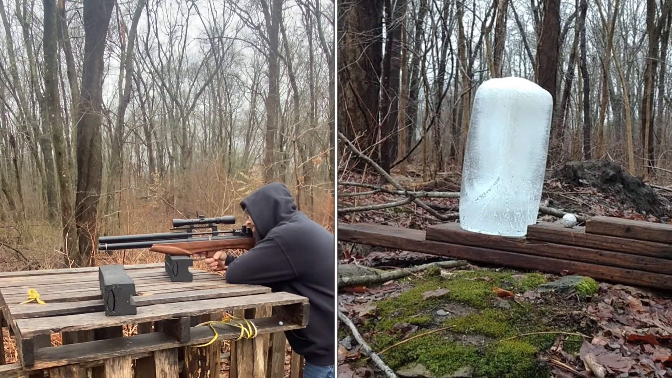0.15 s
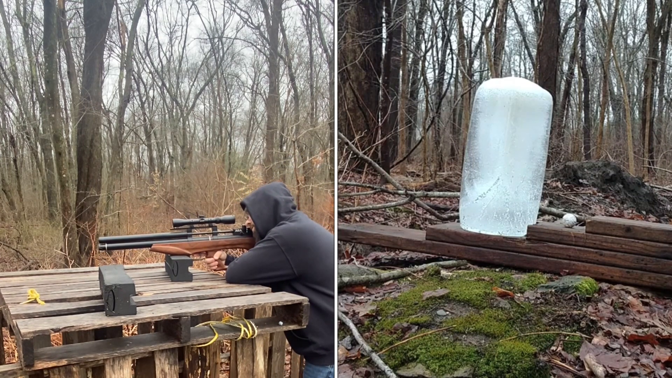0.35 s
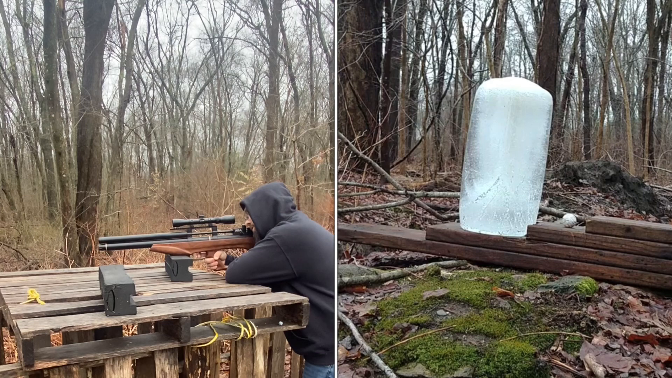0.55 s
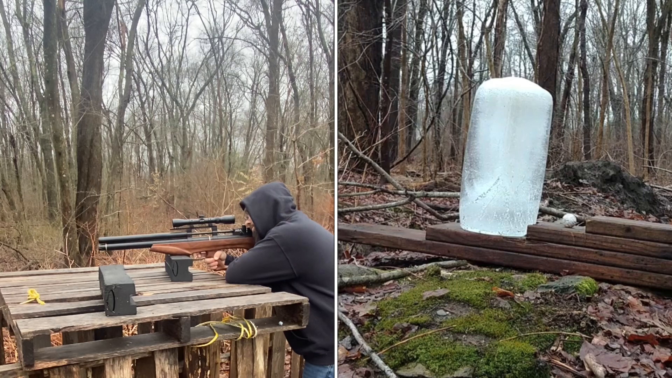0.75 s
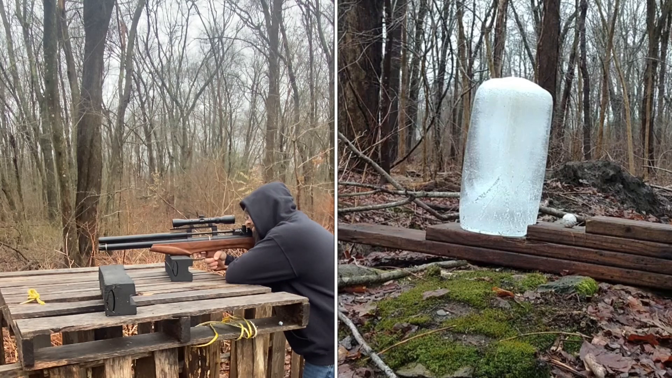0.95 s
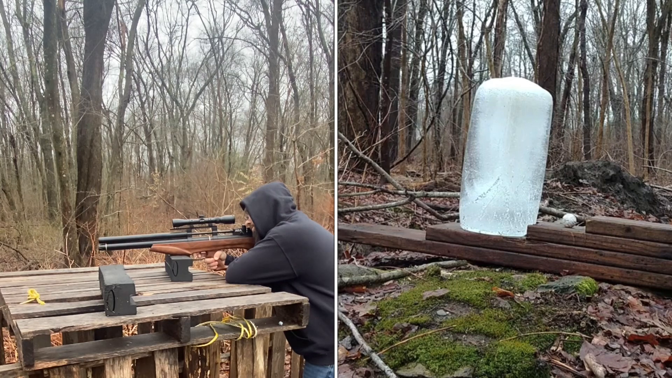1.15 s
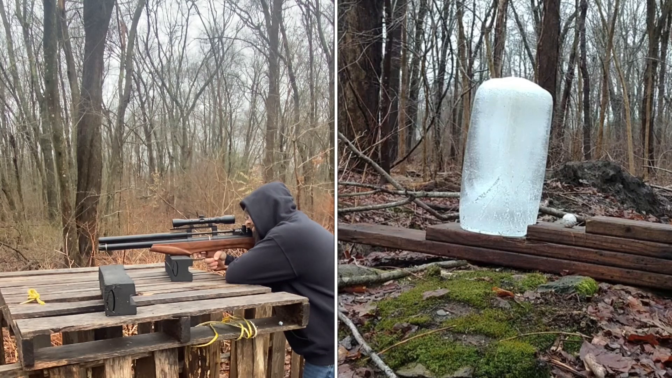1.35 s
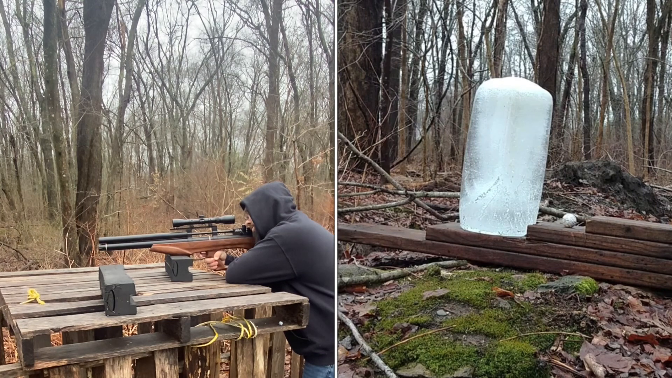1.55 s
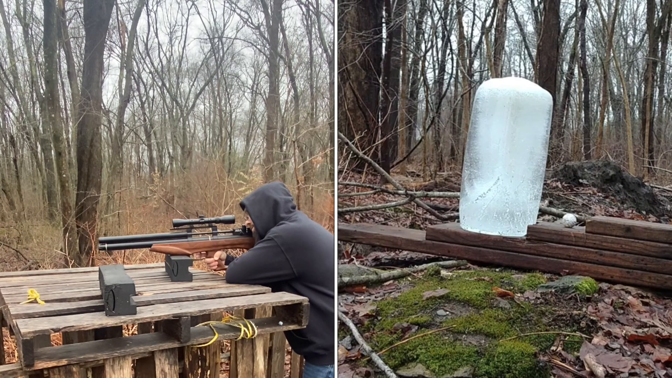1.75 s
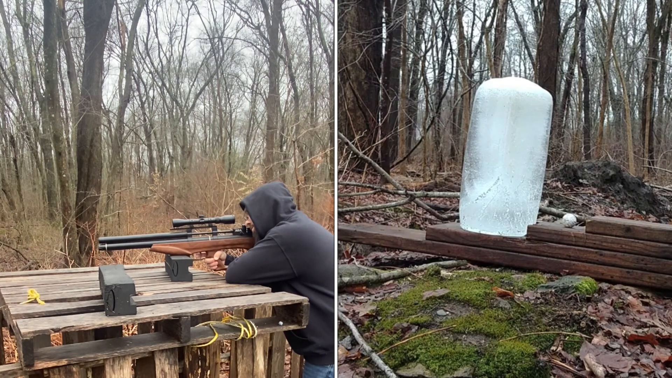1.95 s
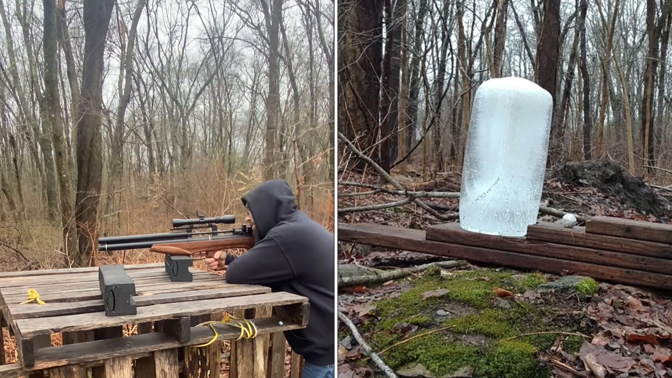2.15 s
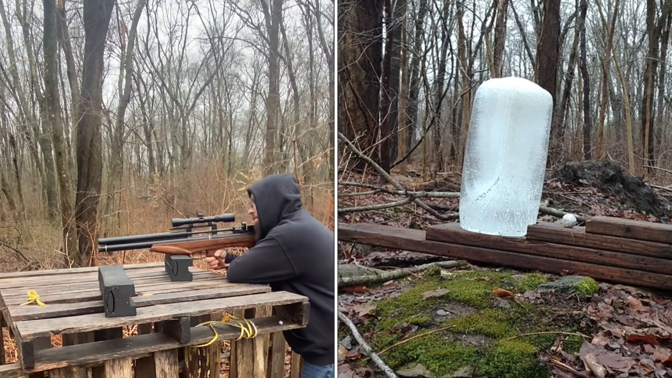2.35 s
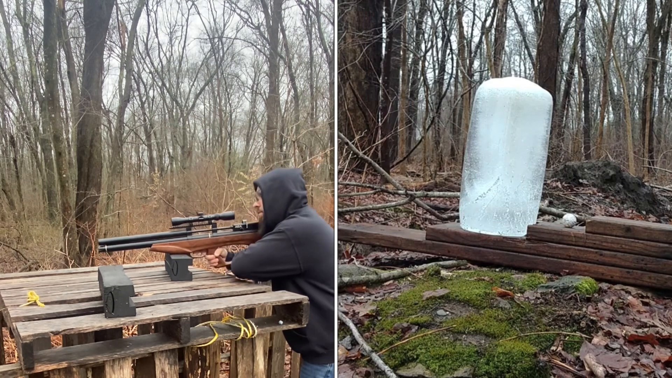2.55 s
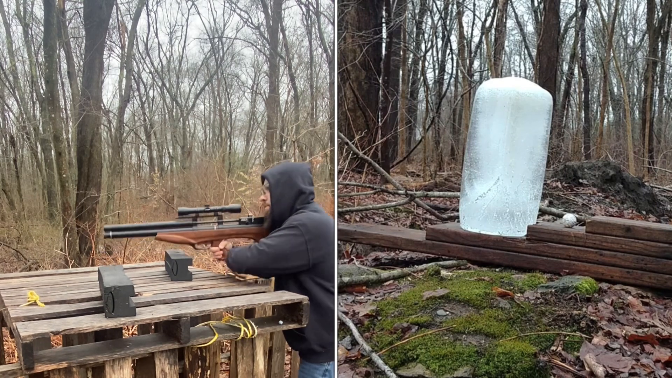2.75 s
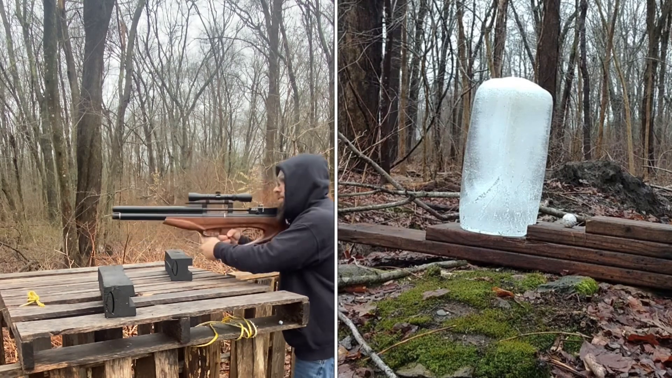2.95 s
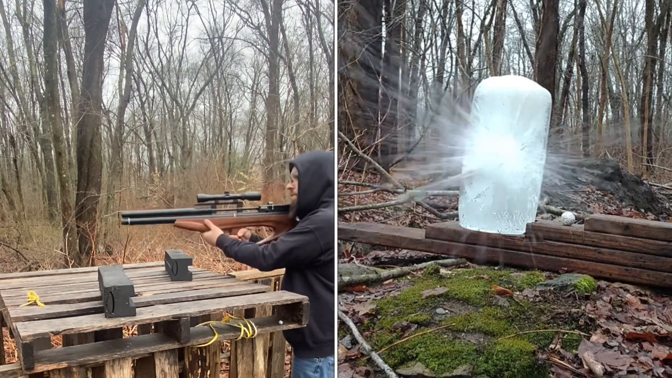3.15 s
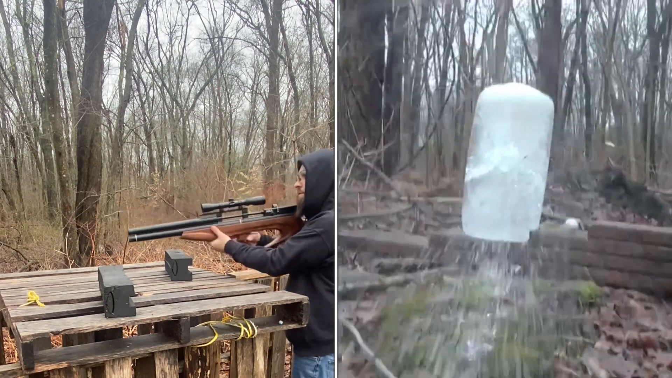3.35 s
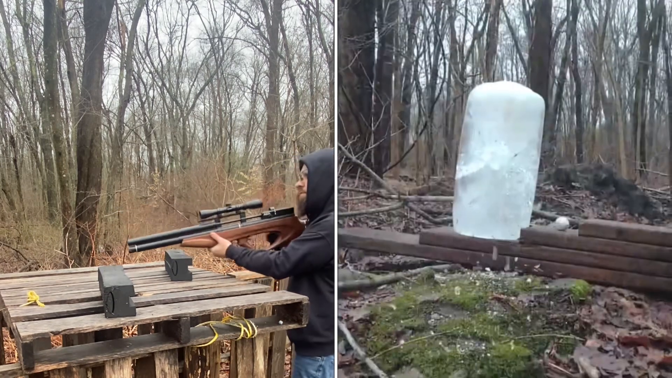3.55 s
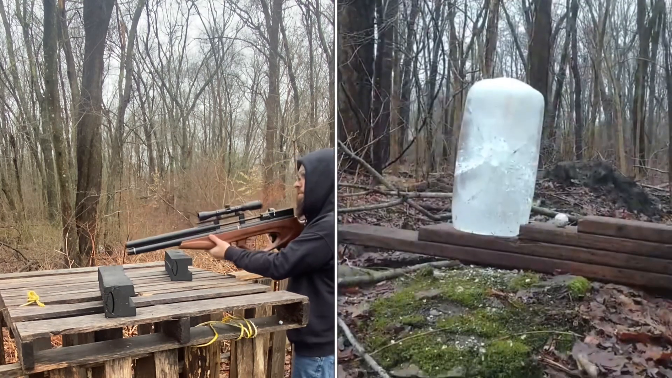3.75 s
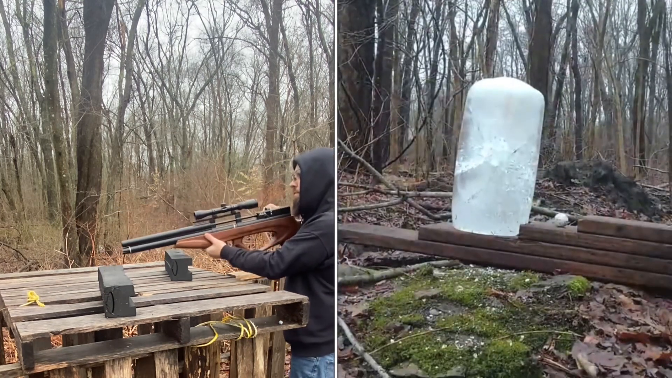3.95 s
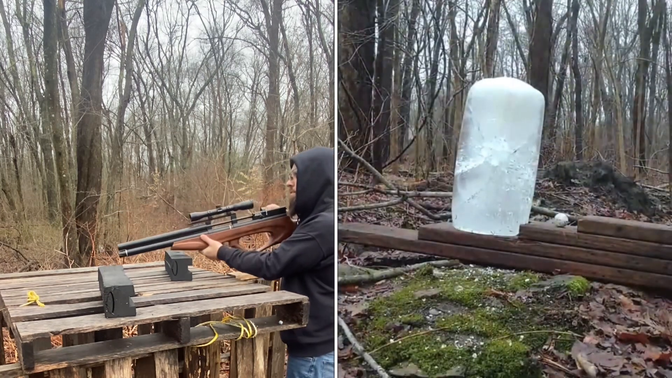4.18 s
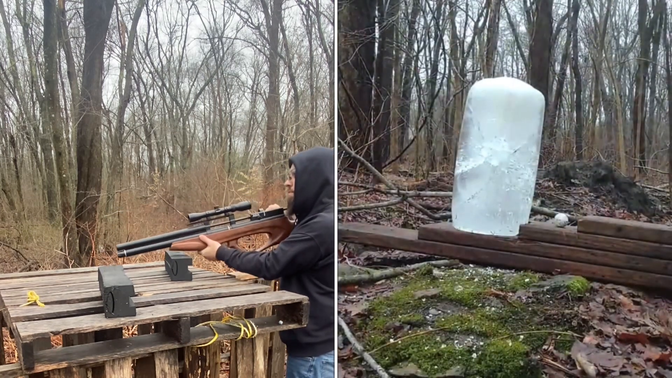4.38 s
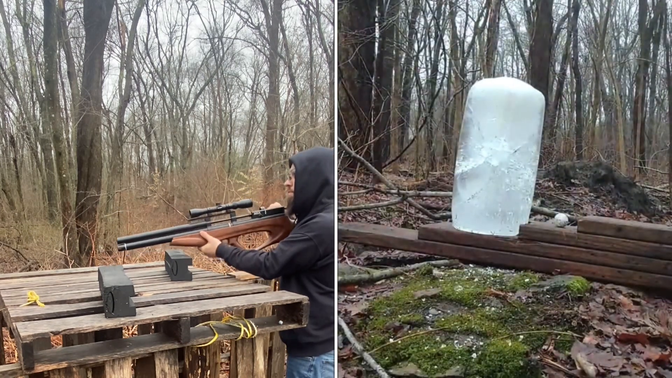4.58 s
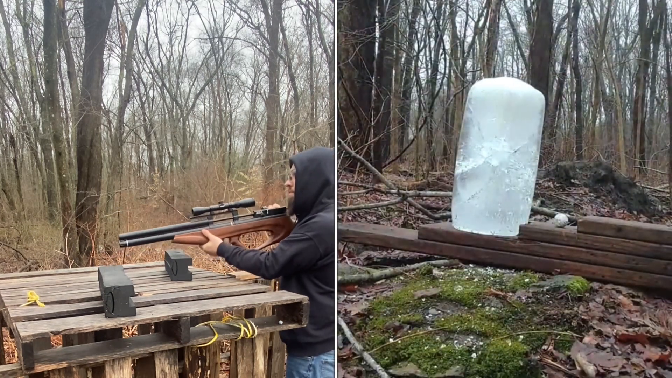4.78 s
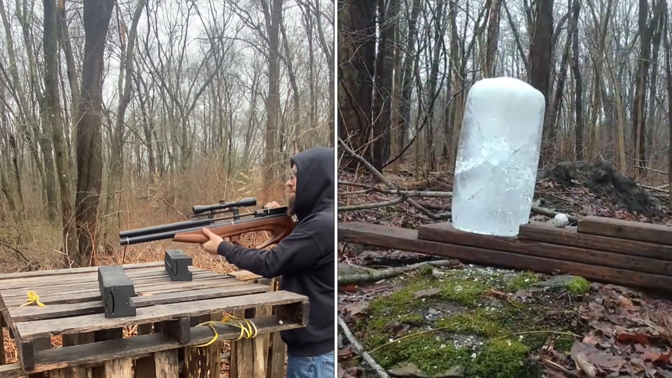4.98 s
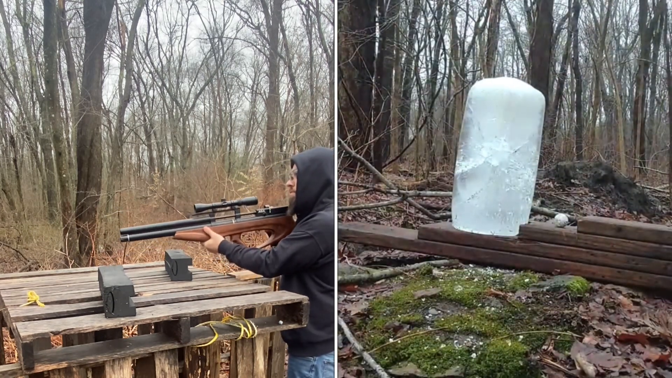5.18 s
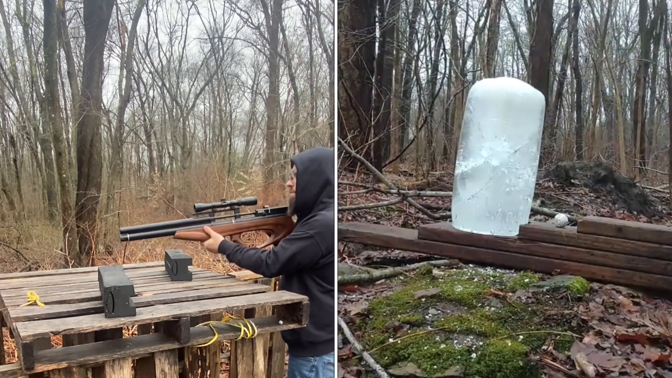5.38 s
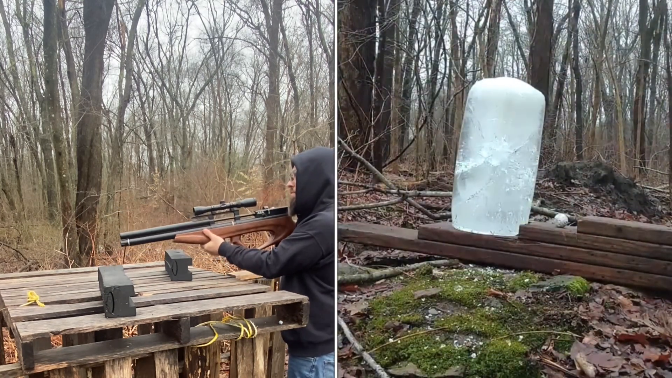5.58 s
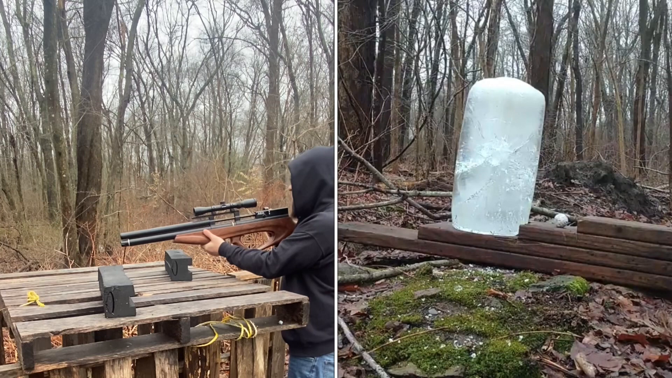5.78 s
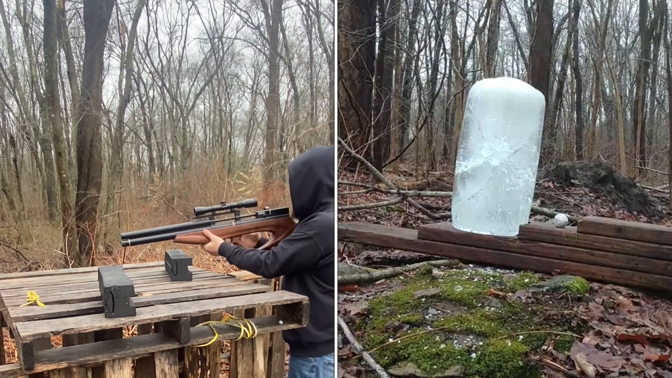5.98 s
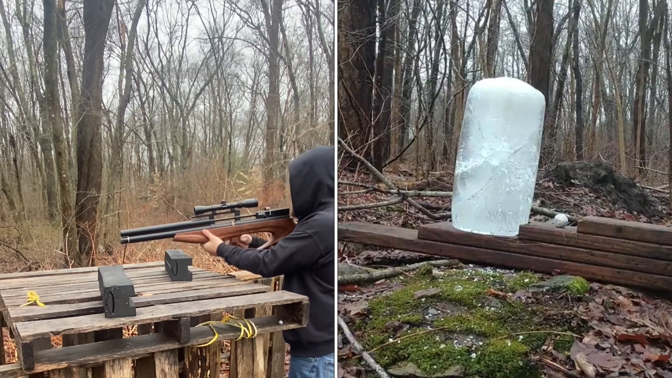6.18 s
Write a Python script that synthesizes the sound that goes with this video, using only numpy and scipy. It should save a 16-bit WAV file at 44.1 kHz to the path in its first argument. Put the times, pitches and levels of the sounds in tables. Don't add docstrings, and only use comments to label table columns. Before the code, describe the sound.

A quiet damp wood with far traffic: soft mid-range wash and deep rumble, gently swelling. A barely audible tick comes at 0.2 s. At 1.43 s an air rifle fires close by: a very loud, hard metallic snap with a short burst of air, ringing barrel and low table thud, another clack at 1.5 s, then a brief echo from the trunks fading into the wood. A faint dull thump falls at 2.4 s. At 3.18 s ice cracks explosively near the second microphone, chips batter its housing in irregular thumps and grainy spray hisses until about 3.45 s; the road wash drops, then slowly recovers over faint settling dust. Light clicks start at 3.87 s, with bolt scrapes and lever ticks around 4.13 to 4.9 s, and a strong metallic clack at 5.04 s. Near 6.06 s a wet crust slips softly as traffic swells.

```python
import sys
import numpy as np
from scipy import signal
from scipy.io import wavfile
from scipy.ndimage import uniform_filter1d

SR = 44100
rng = np.random.default_rng(int(sys.argv[2]) if len(sys.argv) > 2 else 0)


def persist_wave(psi):
    counts = np.round(np.clip(psi, -1, 1) * 32767).astype(np.int16)
    wavfile.write(sys.argv[1], SR, np.atleast_2d(counts).T)


def boost(x):
    u = np.asarray(x, float) / 20
    return 10 ** u


N = 274474


def evened(x):
    return x / np.sqrt(np.mean(x ** 2) + 1e-20)


def read(points, hz):
    f, value = np.transpose(points)
    return np.interp(np.log(hz + 1), np.log(f + 1), value)


def over_time(points):
    return np.interp(np.arange(N) / SR, *np.transpose(points))


def add(mix, s, sound):
    part = mix[:, round(s * SR):][:, :sound.shape[1]]
    part += sound[:, :part.shape[1]]


def ring(x, hz, width):
    r = np.exp(-np.pi * width / SR)
    return 2 * signal.lfilter([1 - r], [1, -r * np.exp(2j * np.pi * hz / SR)], x).real


def bursts(rows, start_s=0):
    ms = np.arange(N) / SR * 1000
    s, db, rise, hold, t60 = np.transpose(rows)[..., None]
    late = ms - 1000 * s
    loss = np.maximum(-late / rise, 0) + np.maximum(late - hold, 0) / t60
    gain = boost(np.maximum((db - 60 * loss).max(0), -200))
    return gain * (ms >= 1000 * start_s)


# frequency in Hz, likeness from -1 to 1.
SAME = [(60, 0.99), (130, 0.8), (290, 0.72), (640, 0.33), (1400, -0.037), (3100, -0.33), (6800, -0.0039),
        (15000, -0.54)]


def noise(colour, side=((1, 0), (2, 0)), patchy_db=1.0, peaks=(), alike=0.99, size=N):
    hz = np.fft.rfftfreq(2048, 1 / SR)
    a, b, c, d, patches = rng.standard_normal((size // 512 + 5, 1025, 5)).T
    patches = evened(uniform_filter1d(uniform_filter1d(patches, 16, 0), 8, 1))
    same = np.clip(alike * read(SAME, hz), -1, 1)[:, None]
    left = a + 1j * b
    right = same * left + np.sqrt(1 - same ** 2) * (c + 1j * d)
    peaks_db = sum(db / (1 + (2 * (hz - f) / w) ** 2) for f, w, db in peaks)
    shape_db = read(colour, hz) + peaks_db
    side_db = np.outer([.5, -.5], read(side, hz))
    z = np.array([left, right]) * boost(shape_db[:, None] + patchy_db * patches) * boost(side_db)[..., None]
    out = signal.istft(z, nperseg=2048, noverlap=1536)[1][:, :size]
    return np.pad(out / np.std(out.mean(0)), ((0, 0), (0, N - size)))


# frequency in Hz, level in dB per Hz.
ROAD = [(180, -46), (300, -11), (694, -5.5), (892, -1), (1580, -9.5), (2170, -20), (3300, -19),
        (3840, -26.5), (5460, -33.5), (8730, -49.5), (12000, -43.5), (14700, -44), (15700, -47),
        (16500, -61.5)]
# time in seconds, level in dB.
TRAFFIC = [
    (0, -45.5),
    (1.3, -48),
    (1.75, -45.5),
    (2.6, -48),
    (3.2, -47),
    (5.5, -47),
    (6.05, -43.5),
    (6.22, -44.5),
]
# frequency in Hz, left over right in dB.
ICE_SIDE = [(1000, 1), (8000, -2), (11000, 9), (15000, 15.5)]
# centre in Hz, width in Hz, depth in
# dB.
SHARED_DIP = [(6560, 420, -6)]
# frequency in Hz, level in dB per Hz.
WOOD = [(76, -36), (130, -7), (162, -9), (203, -2), (451, -24), (564, -13.5), (718, -15), (802, -20.5),
        (1370, -7.5), (11000, -46.5), (14300, -79), (22000, -120)]
# frequency in Hz, level in dB per Hz.
RUMBLE = [(12, -68), (20, -34.5), (23, -20), (30, -11.5), (54, 0), (97, -8), (113, -8.5), (242, -24),
          (300, -25.5), (390, -55), (660, -120)]
# centre in Hz, width in Hz, lift in dB.
ENGINE = [(56, 16.3, 7)]
# time in seconds,
# extra level in dB, width in seconds.
SWELLS = [
    (.05, 4.5, 0.18),
    (.45, 6, .12),
    (1.5, -4.5, 0.04),
    (1.9, 3.5, 0.14),
    (2.45, 3, 0.13),
    (3.15, 3, 0.29),
    (4.2, 2.5, 0.15),
    (6.25, 7.5, 0.47),
]
WOOD_DB, RUMBLE_DB = -55.5, -53
DUCK_AT_S, DUCK_DB, DUCK_FALL_S, DUCK_HOLD_S, DUCK_BACK_S = 3.15, -6, 0.18, 0.61, 2.06


def background(near):
    t = np.arange(N) / SR
    turns = DUCK_AT_S + np.cumsum([0, DUCK_FALL_S, DUCK_HOLD_S, DUCK_BACK_S])
    duck_db = DUCK_DB * np.interp(t, turns, [0, 1, 1, 0])
    road = boost(1.0 + over_time(TRAFFIC) + duck_db) * noise(ROAD, ICE_SIDE, peaks=SHARED_DIP)
    treble = signal.sosfiltfilt(signal.butter(4, [9000, 13000], "band", fs=SR, output="sos"), road)
    near_db = 10 * np.log10(abs(uniform_filter1d((near ** 2).mean(0), 1500)) + 1e-12)
    road -= treble * (1 - boost(-1.5 * np.maximum(near_db + 46.5, 0)))
    swell_db = sum(db * np.exp(-.5 * ((t - s) / width) ** 2) for s, db, width in SWELLS)
    rumble = boost(6.0 + RUMBLE_DB + swell_db) * noise(RUMBLE, patchy_db=1.5, peaks=ENGINE)
    return road + rumble + boost(WOOD_DB) * noise(WOOD, peaks=SHARED_DIP)


# centre in Hz, width in Hz, level in dB.
RIFLE = [(547, 60, 12.5), (1100, 270, -12), (1630, 140, 7.5), (2200, 600, 7), (2736, 370, 5),
         (3300, 440, -1), (3800, 324, 6.5), (4200, 220, 4), (4600, 140, -4.5), (5420, 880, -6),
         (6290, 320, -2), (7770, 280, -2.5), (7400, 280, 9.5), (8850, 390, -14.5)]


def knock(db, rise_ms, t60_ms, hz, side_db):
    t = np.arange(6000) / SR * 1000 - 3 * rise_ms
    envelope = np.where(t < 0, np.exp(-.5 * (t / rise_ms) ** 2), boost(-60 * np.maximum(t, 0) / t60_ms))
    grit = rng.standard_normal((2, len(t))) * boost(4.3 * rng.standard_normal(len(t)))
    grit[1, np.argmax(envelope)] = 5.9 / rise_ms
    grit[0] = .8 * np.roll(grit[1], 3) + .6 * grit[0]
    push = grit * envelope
    modes = boost(4.5) * ring(ring(push, hz, 0.15 * hz), hz, .09 * hz)
    for f, width, mode_db in RIFLE:
        apart = np.log2(f / hz) ** 2
        loss_db = min(13.0 * apart, 10.5) if f > hz else 16 * apart
        modes += boost(mode_db - loss_db) * ring(ring(push, f, 3.66 * width), f, 1.42 * width)
    modes = signal.lfilter(*signal.butter(3, .5 * hz, "high", fs=SR), modes)
    modes = signal.lfilter(*signal.butter(1, min(3.0 * hz, .45 * SR), fs=SR), modes)
    modes = signal.lfilter(*signal.butter(6, 8600, fs=SR), modes)
    modes /= abs(modes).max(1, keepdims=True)
    return boost(db) * boost(np.array([[.5], [-.5]]) * side_db) * modes


# start in seconds, peak in dB, centre in Hz, left over right in dB.
CLICKS = [(0.197, -37, 4300, 1), (.199, -36, 2200, -10), (1.4242, -13, 4800, -4), (3.8739, -23.5, 3300, -8),
          (3.877, -28, 1710, -6), (4.13, -29.5, 3800, -14.5), (4.1335, -21.5, 3440, -2),
          (4.3059, -19.5, 3950, 11), (4.34, -22.5, 3670, 10), (4.552, -27.5, 4200, 2),
          (4.554, -32.5, 2200, -14), (4.769, -33, 4300, -2.5), (4.868, -30, 4300, -3),
          (4.896, -35, 2980, -5), (5.044, -13, 2490, -9)]
# start in
# seconds, peak in dB, centre in Hz, left over right in dB.
STRIKES = [(1.428, -3, 3300, -17), (1.4289, -8, 3800, -1), (1.43, 1.5, 3030, 14), (1.5053, -12, 1830, 9),
           (1.5057, -15, 4300, -4), (1.5056, -24, 603, 10), (1.516, -25, 1690, -2), (1.5304, -21, 3020, -8),
           (4.2592, -22.5, 5000, 7), (4.61, -31.5, 4600, -3), (5.0418, -15, 6200, -8),
           (5.0418, -16, 7160, -6.5), (5.0421, -6.5, 2660, -5)]
# start in seconds, peak in dB, centre in Hz, left over right in dB, rise in ms.
SLIDES = [
    (4.247, -40, 3970, -6, 1.9),
    (4.271, -27, 3500, -8, 6.8),
    (4.297, -26, 3500, -6, 2.2),
    (4.318, -17, 3300, -8.5, 7.8),
    (4.889, -26, 3040, -6, 2.25),
    (5.034, -29.5, 3000, -10, 1),
    (5.049, -26.5, 3500, 6, 2.9),
]
# frequency in Hz, t60 in seconds.
TRUNKS = [(500, 0.42), (3000, 0.26), (9000, 0.21)]
CLICK_RISE_MS, CLICK_T60_MS = .7, 24.6
STRIKE_RISE_MS, STRIKE_T60_MS = 0.3275, 2.7
SLIDE_T60_MS = 78


def rifle():
    dry = np.zeros((2, N))
    rows = [(*row, STRIKE_RISE_MS, STRIKE_T60_MS) for row in STRIKES]
    rows += [(*row, CLICK_RISE_MS, CLICK_T60_MS) for row in CLICKS]
    rows += [(*row, SLIDE_T60_MS) for row in SLIDES]
    for s, db, hz, side_db, rise_ms, t60_ms in sorted(rows):
        add(dry, s - 3 * rise_ms / 1000, knock(db, rise_ms, t60_ms, hz, side_db))
    hz, t, z = signal.stft(rng.standard_normal((2, SR // 2)), SR, nperseg=256)
    z = z * boost(-60 * t / read(TRUNKS, hz)[:, None]) * np.minimum(t / 0.018, 1)
    tail = signal.istft(z, SR, nperseg=256)[1]
    tail = tail / np.linalg.norm(tail[0])
    return dry + boost(-17.5) * signal.fftconvolve(dry, tail, axes=1)[:, :N]


# start in seconds, peak in dB, hold in ms, t60 in ms.
BLAST = [
    (1.424, -21.5, 5, 30),
    (1.431, -15.5, 4, 24.84),
    (1.439, -24.5, 23, 80),
    (1.472, -31, 0.5, 268),
]
# frequency in Hz, level in dB per Hz.
BLAST_COLOUR = [(180, -45), (300, -20), (457, -14.5), (516, -20), (628, -12.5), (2190, -7), (2510, -2),
                (3550, -6.5), (4800, 0), (6590, -17.5), (8390, -9.5), (11000, -30.5), (14300, -64.5),
                (22000, -120)]
# centre in Hz, width in Hz, lift in dB.
BARREL = [(2830, 550, 4.5), (3850, 233, 3), (4610, 310, 5), (8080, 95, 9.5), (9440, 180, 3)]
# start in seconds, peak in dB, pitch in Hz, t60 in seconds.
THUMPS = [
    (1.432, -25.5, 207, 0.063),
    (1.435, -20.5, 111, 0.037),
    (2.385, -37, 232, 0.075),
]
# time in seconds, peak in dB, rise in ms, hold in ms, t60 in ms.
ECHO = [
    (1.53, -33.5, 1, 0, 38),
    (1.72, -43.5, 2000, 0, 1140),
]
# frequency in Hz, level in dB per Hz.
ECHO_COLOUR = [(300, -26), (900, 0), (2000, 2), (3500, -0.5), (5000, -6.5), (7500, -9), (9500, -31.5),
               (12000, -50.5)]
BLAST_RISE_MS, ECHO_STARTS_S = 22, 1.53


def shot():
    flutter = boost(3.0 * evened(uniform_filter1d(rng.standard_normal((2, N)), 60)))
    gain = bursts([(s, db, BLAST_RISE_MS, hold, t60) for s, db, hold, t60 in BLAST])
    blast = gain * flutter * noise(BLAST_COLOUR, peaks=BARREL + SHARED_DIP, size=N // 3)
    t = np.arange(SR // 4) / SR
    for s, db, hz, t60 in THUMPS:
        add(blast, s, boost(db - 60 * t / t60) * np.sin(2 * np.pi * hz * t) * [[1.2], [.8]])
    echo = bursts(ECHO, ECHO_STARTS_S) * noise(ECHO_COLOUR, peaks=SHARED_DIP, size=N // 2)
    return blast + boost(0.5) * echo


# start in seconds, push left, push right, fizz in dB.
CRACKS = [
    (3.1776, .4, 0.67, -8.5),
    (3.179, -0.22, -0.53, -11),
    (3.1795, 0.82, 0.65, -14),
    (3.18, -0.29, -0.62, -15.5),
    (3.1969, -0.9, -0.3, -19),
]
# start in seconds, push left, push right, fizz in dB, contact in ms.
CHIPS = [(3.1965, 0.53, 1, -23, .45), (3.2035, -0.2, -0.042, -27, 0.35), (3.2322, -0.25, -0.089, -29.5, .6),
         (3.236, -0.2, -0.11, -14, .3), (3.2437, -.04, .03, -22, 0.27), (3.245, 0.33, -0.092, -27, 1.2),
         (3.2549, 0.02, 0.17, -21.5, 0.36), (3.2695, -0.24, 0.14, -14.5, 1.8), (3.275, 0, -.03, -26, .5),
         (3.2788, 0.19, 0.13, -23, 0.45), (3.2853, .15, -0.064, -18.5, 1.3),
         (3.2902, -.25, 0.1, -20.5, 0.67), (3.3069, -0.1, -0.22, -15.5, .3),
         (3.3117, 0.3, -0.028, -23, 1.1), (3.325, -0.06, -0.02, -23, 1.4), (3.329, -.13, .12, -22.5, 1.2),
         (3.3358, -0.2, -0.021, -24, 0.39), (3.3556, -0.12, 0.33, -38.5, .14),
         (3.3565, -0.66, -0.047, -42, 0.25), (3.3558, 0.33, -0.31, -43, 4.1), (3.385, .01, .01, -34, .3),
         (3.438, .01, .01, -34.5, .3)]
# centre in Hz, width in Hz, lift in dB.
ICE_RING = [(1370, 240, 4.5), (405, 490, -4), (2083, 700, -11), (3500, 1700, 2.5), (4300, 550, -12.5),
            (5000, 190, 8), (6600, 480, -5.5), (7640, 560, 9), (9130, 700, -16)]
# time in seconds, peak in dB, rise in ms, hold in ms, t60 in ms.
SPRAY = [
    (3.18, -30.5, 9.9, 14.5, 55),
    (3.24, -40, 81, -4.5, 126),
    (3.28, -38.5, 65, 17, 60),
    (3.308, -33.5, 100, 1.5, 130),
    (3.33, -44.5, 60, 19, 77),
    (3.37, -58, 60, 62, 250),
]
# frequency in Hz, level in dB per Hz.
ICE = [(150, -3.5), (1200, -2.5), (3000, -1.5), (6000, -9.5), (9300, -15.5), (11000, -16.5), (13500, -12),
       (15600, -15.5), (16300, -36)]
# time in seconds, peak in dB, rise in ms, hold in ms, t60 in ms.
DUST = [
    (3.52, -60, 1700, 300, 2400),
    (5.885, -62, 48, 2, 105),
    (6.058, -43.5, 38, -3, 165),
    (6.1, -60.5, 300, 0, 940),
]
# frequency in Hz, level in dB per Hz.
DUST_COLOUR = [(1200, -25), (2200, 0.5), (3300, 5), (4250, -5), (5200, 3), (6600, -15), (7600, -5.5),
               (9200, -23.5), (11500, -10.5), (15500, -16), (16200, -40)]
CRACK_MS, EDGE_MS, DUST_STARTS_S = 0.058, 0.18, 3.36


def ice():
    t = np.arange(1500) / SR * 1000
    fizz, push = np.zeros((2, N)), np.zeros((2, N))
    for s, left, right, fizz_db, width_ms in [(*row, CRACK_MS) for row in CRACKS] + CHIPS:
        blow = (1 - np.exp(-t / EDGE_MS)) ** 2 * np.exp(-t / width_ms)
        blow /= blow.max()
        add(push, s, np.array([left * blow, right * np.roll(blow, 6)]))
        add(fizz, s - .0003, boost(fizz_db - 10.0 * t) * np.ones((2, 1)))
    shared, rocking = (push[0] + push[1]) / 2, (push[0] - push[1]) / 2
    shared = signal.lfilter(*signal.butter(2, 110, "high", fs=SR), shared)
    rocking = signal.lfilter(*signal.butter(2, 45, "high", fs=SR), rocking)
    for hz, width, db in ICE_RING:
        shared = shared + (boost(1.68 * db) - 1) * ring(shared, hz, width)
    grains = boost(2.4 * evened(uniform_filter1d(rng.standard_normal(N), 40)))
    hiss = noise(ICE, ICE_SIDE, peaks=ICE_RING, alike=1.15, size=2 * N // 3)
    spray = (.5 * fizz + bursts(SPRAY) * grains) * hiss
    dust = bursts(DUST, DUST_STARTS_S) * grains ** .6 * noise(DUST_COLOUR, ICE_SIDE, patchy_db=2.5)
    return shared + rocking * [[1], [-1]] + spray + dust


def scene():
    near = .9 * np.tanh((shot() + rifle()) / .9)
    near = boost(-37) * near + signal.sosfilt(signal.butter(16, 9800, fs=SR, output="sos"), near)
    rattle = near ** 2 * rng.standard_normal((2, N))
    rattle = signal.sosfilt(signal.butter(4, [13800, 16000], "band", fs=SR, output="sos"), rattle)
    return background(near) + near + boost(-24.5) * rattle + ice()


def low_pass(x):
    return signal.sosfilt(signal.butter(12, 16780, fs=SR, output="sos"), x)


def record(dry):
    dry = signal.sosfiltfilt(signal.butter(4, 35, "high", fs=SR, output="sos"), dry)
    return low_pass(np.clip(dry, -1, 1))


dry = scene()
out = record(dry)
persist_wave(out)
```